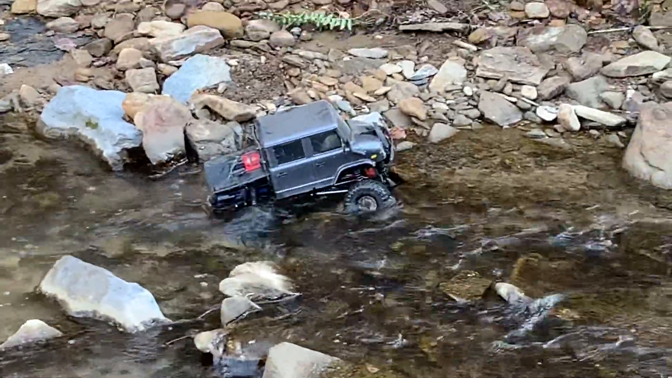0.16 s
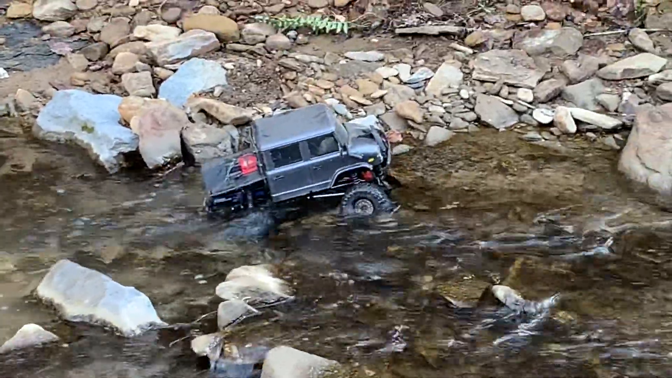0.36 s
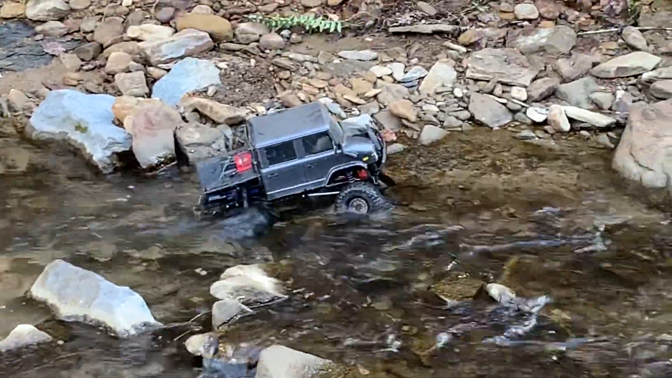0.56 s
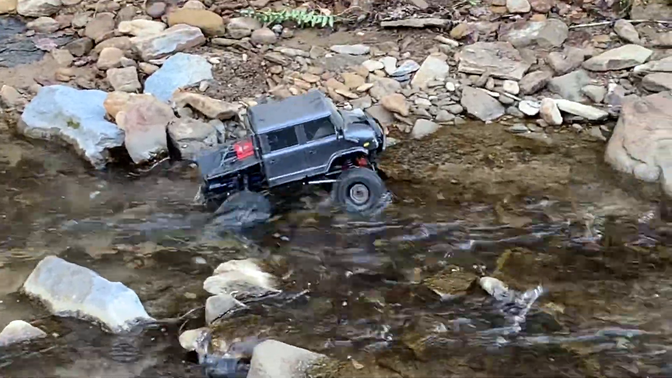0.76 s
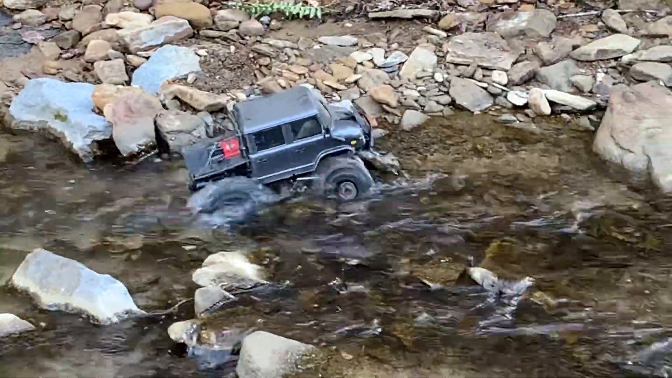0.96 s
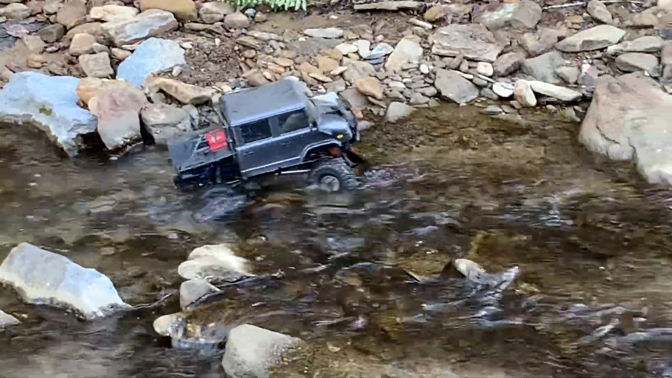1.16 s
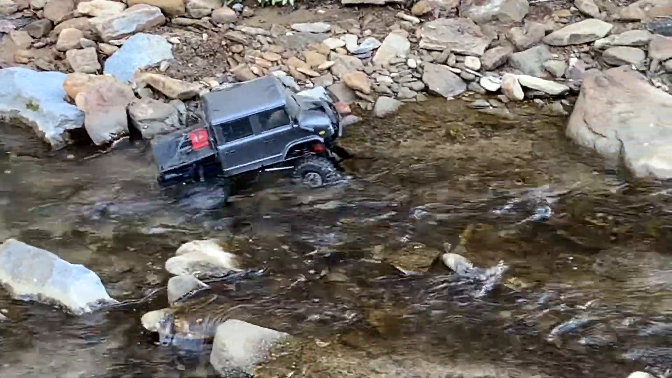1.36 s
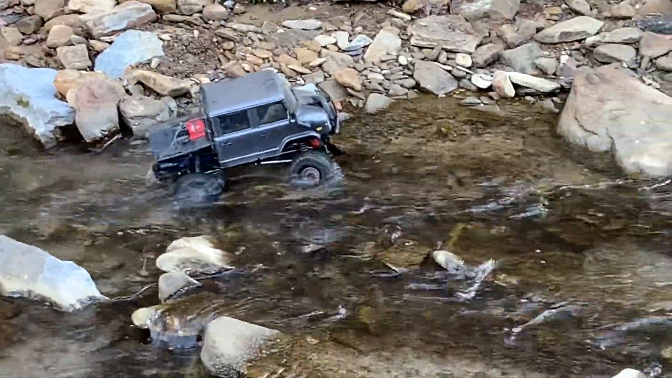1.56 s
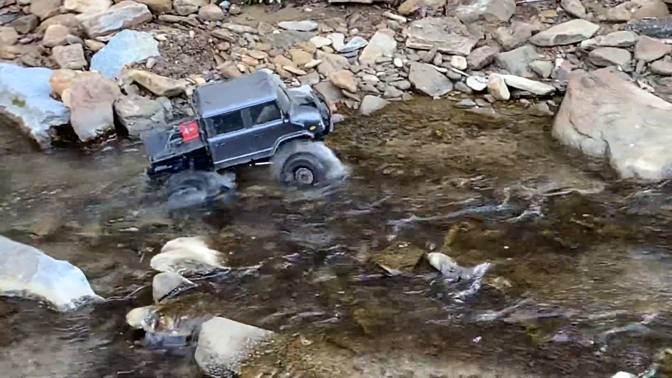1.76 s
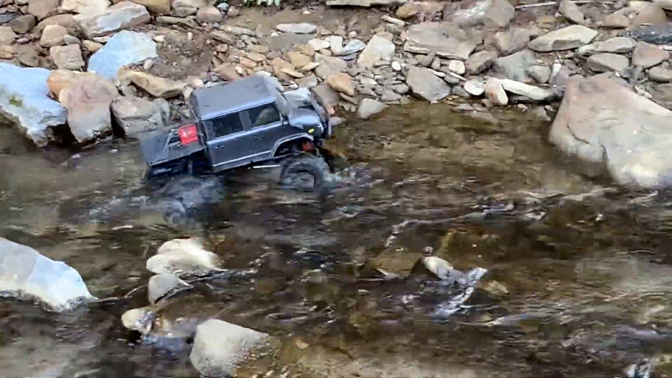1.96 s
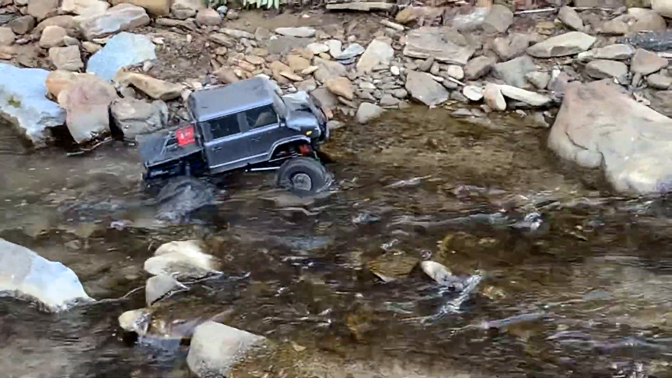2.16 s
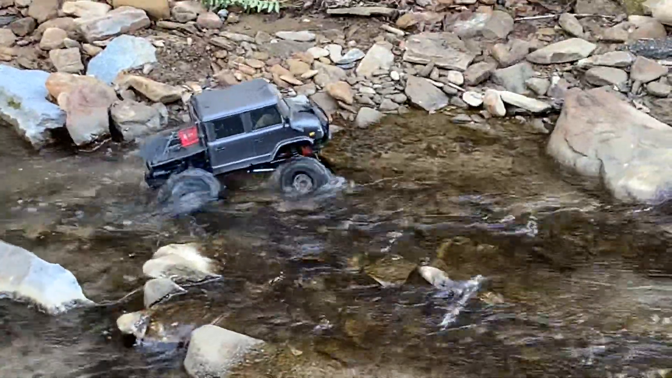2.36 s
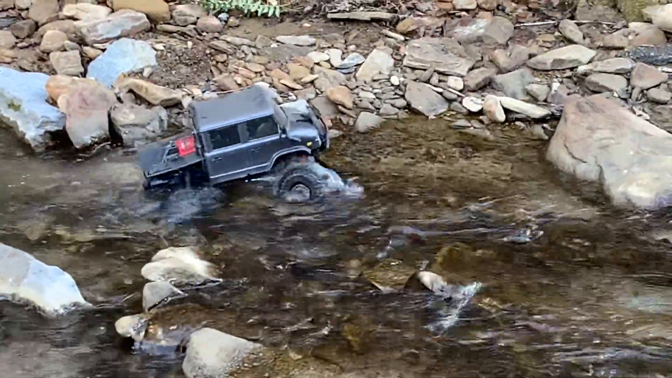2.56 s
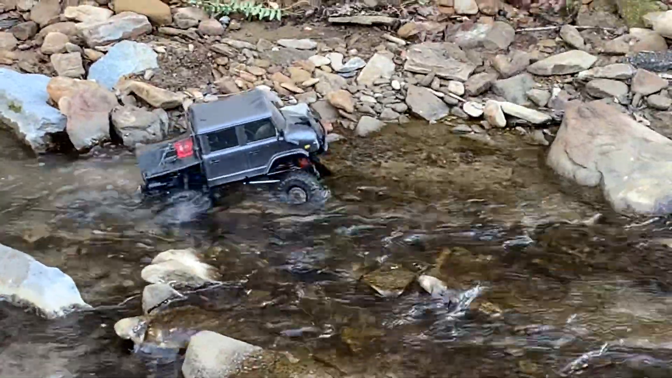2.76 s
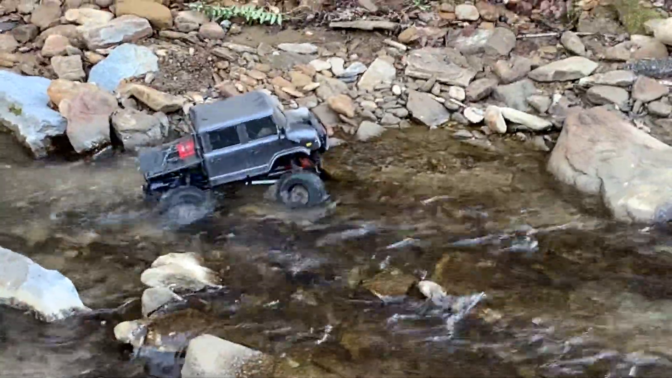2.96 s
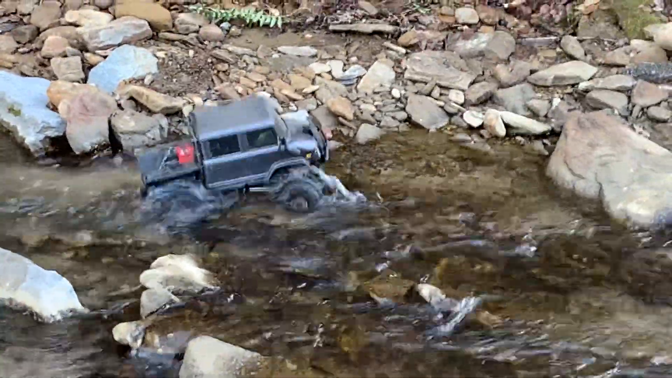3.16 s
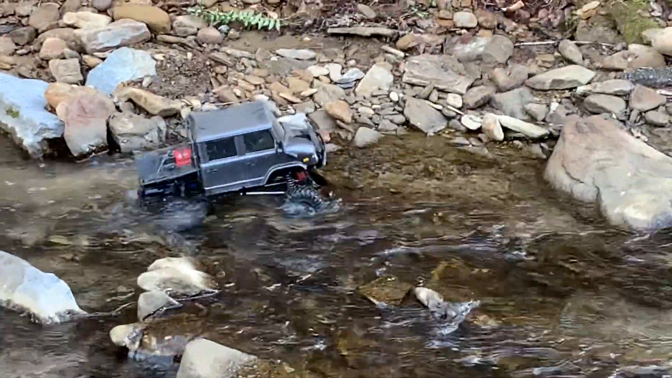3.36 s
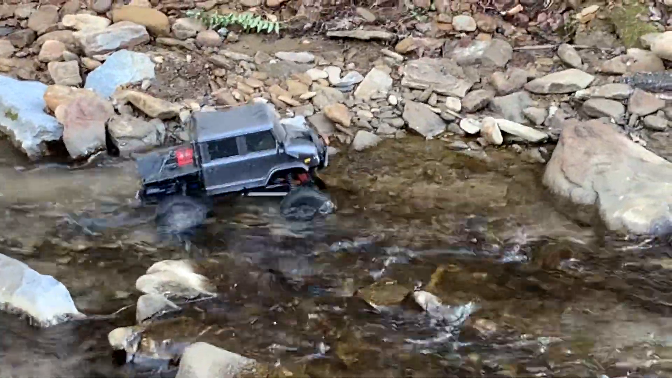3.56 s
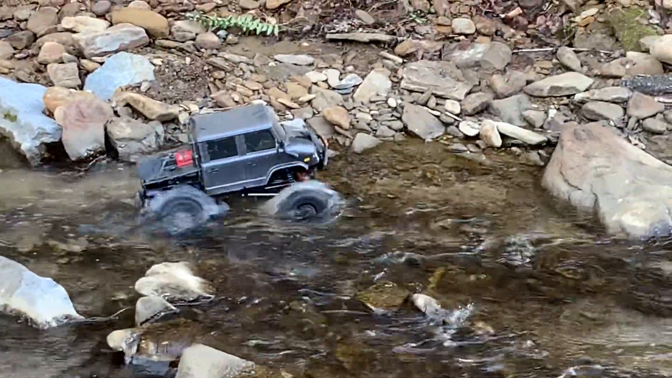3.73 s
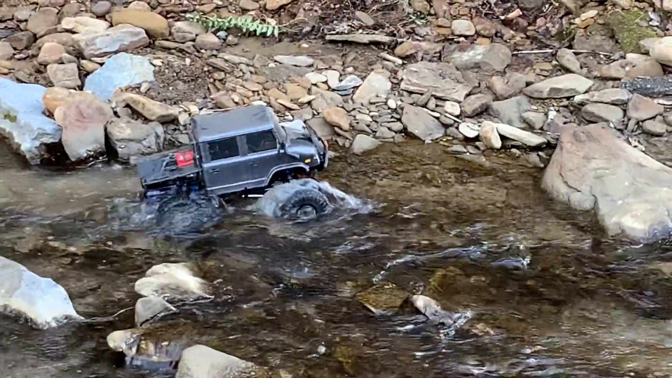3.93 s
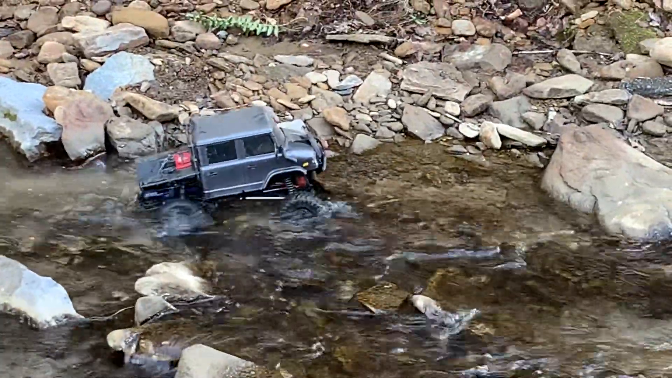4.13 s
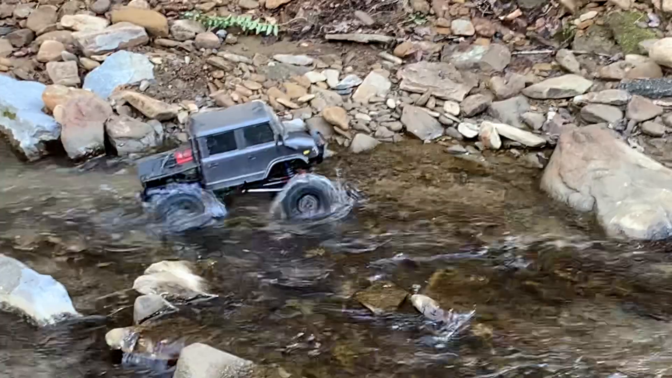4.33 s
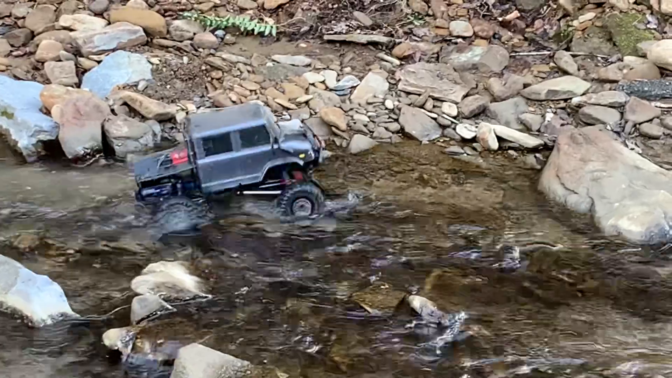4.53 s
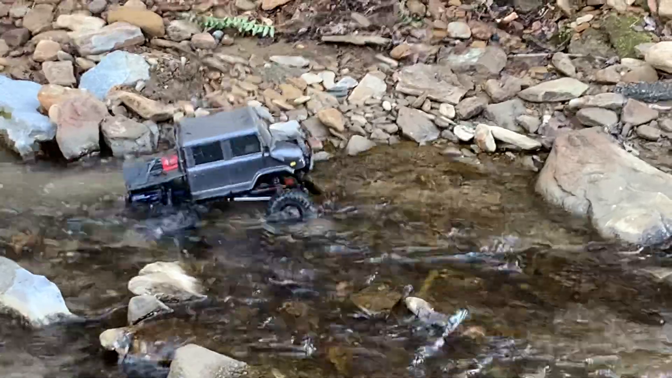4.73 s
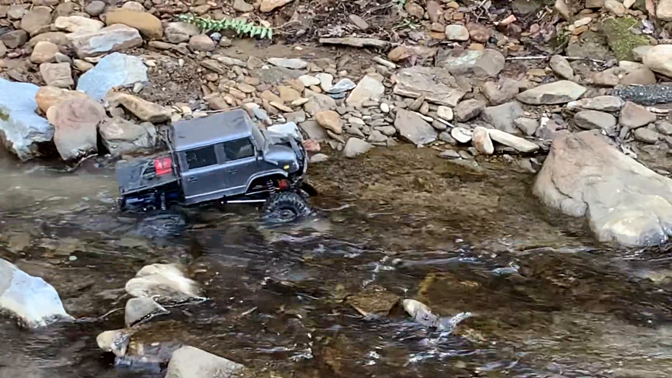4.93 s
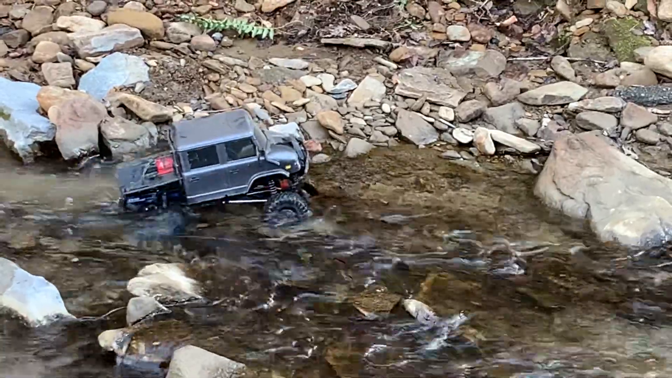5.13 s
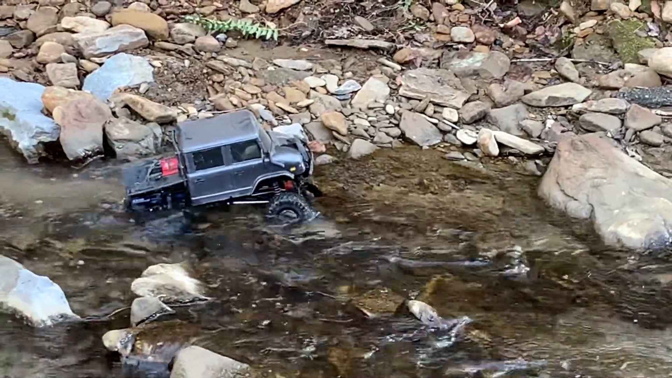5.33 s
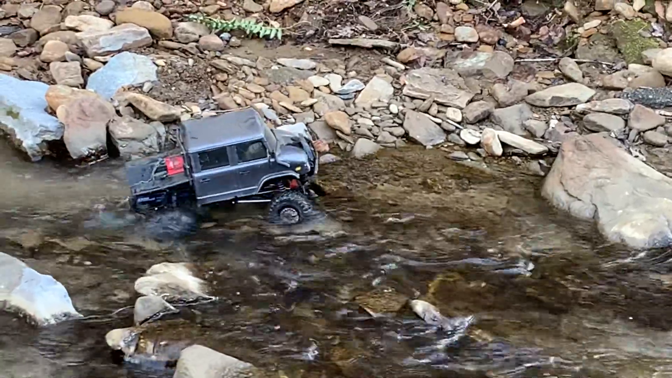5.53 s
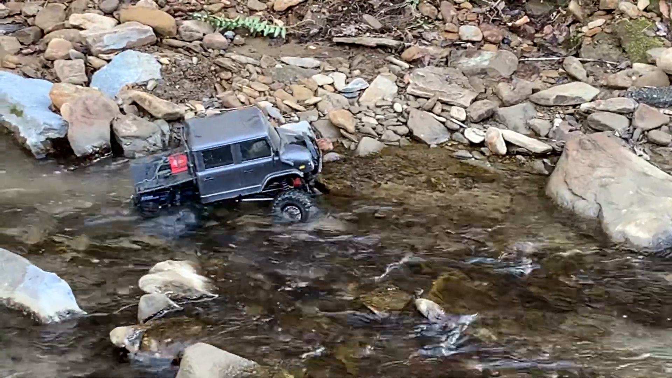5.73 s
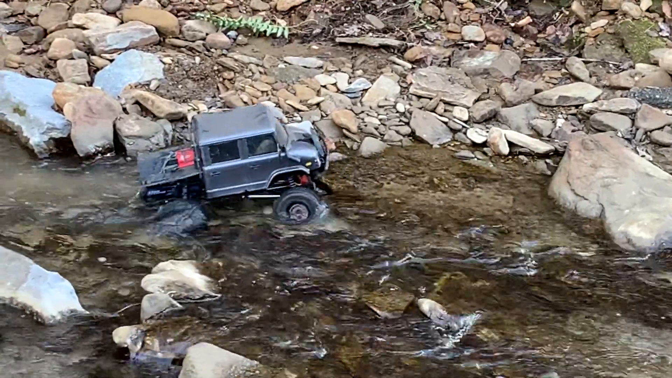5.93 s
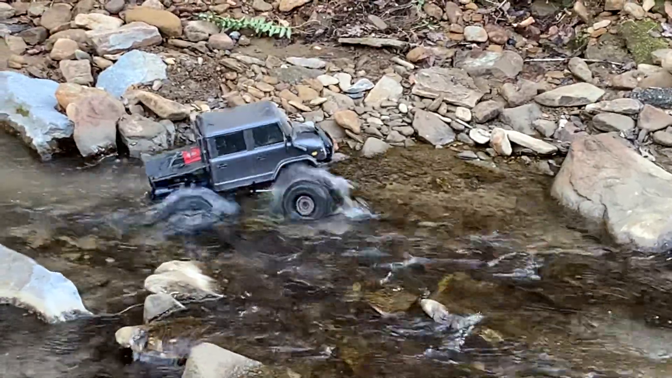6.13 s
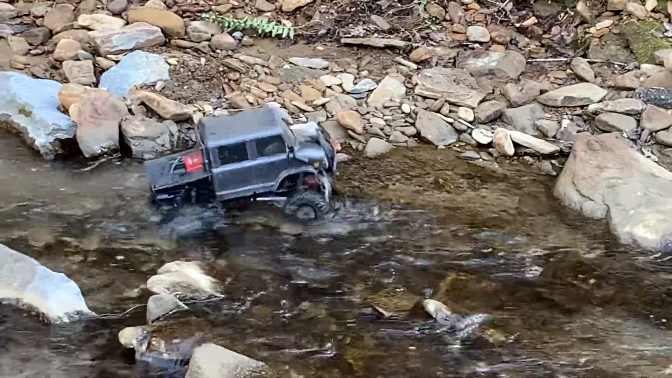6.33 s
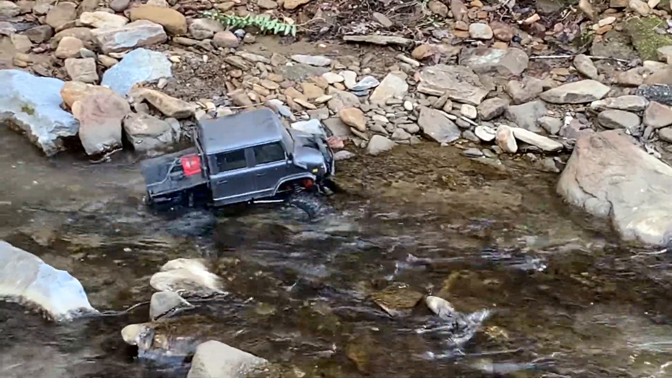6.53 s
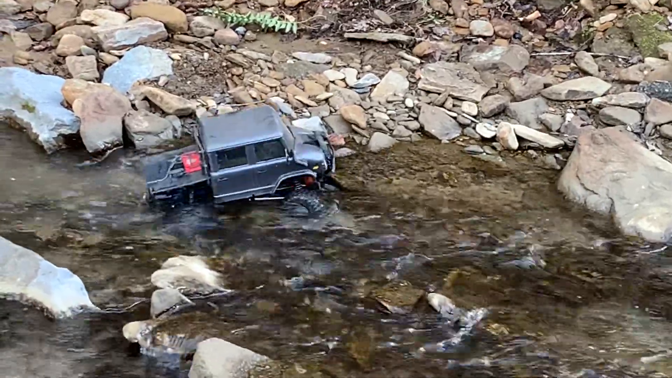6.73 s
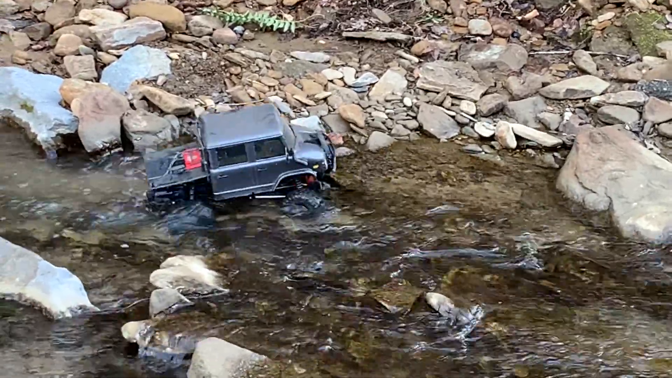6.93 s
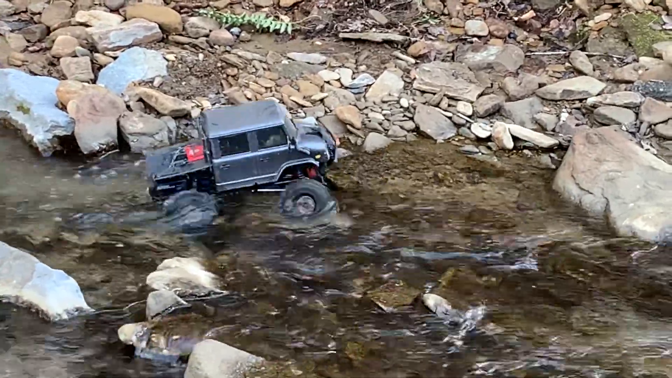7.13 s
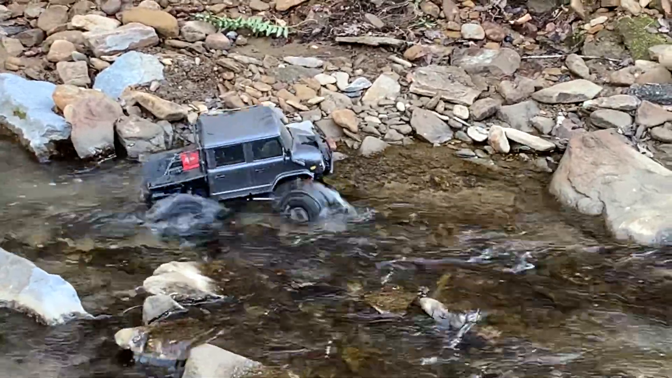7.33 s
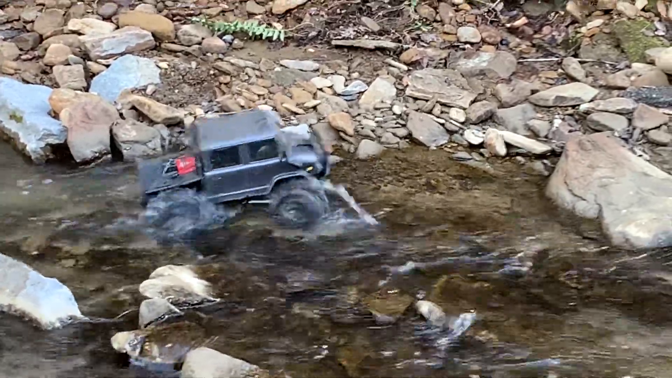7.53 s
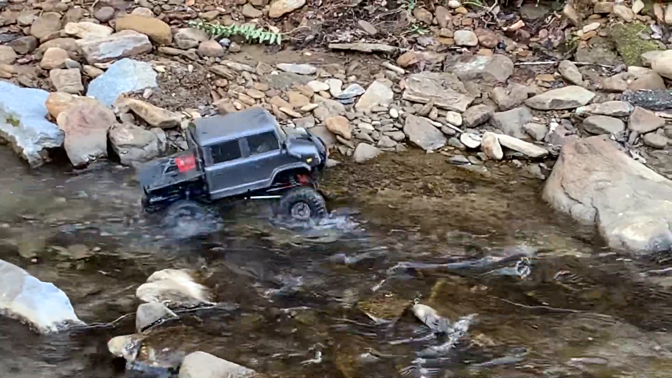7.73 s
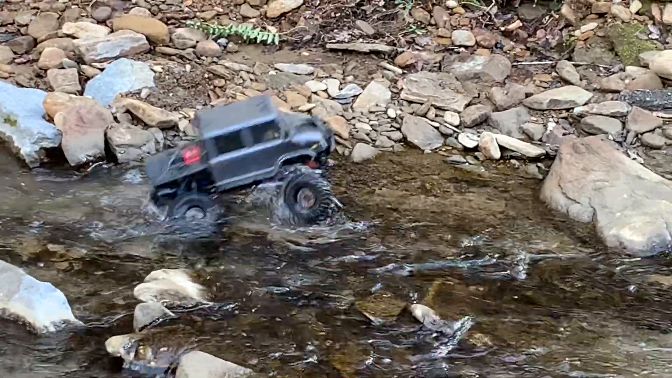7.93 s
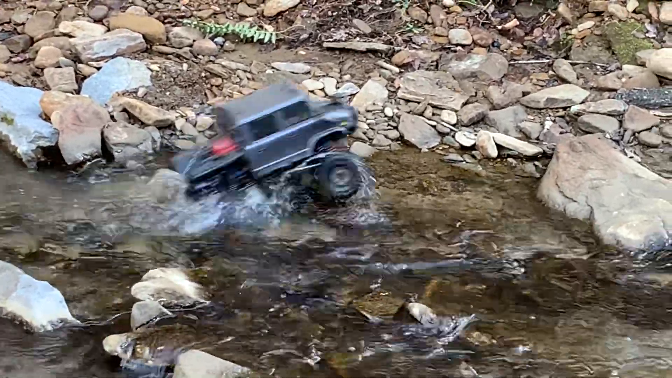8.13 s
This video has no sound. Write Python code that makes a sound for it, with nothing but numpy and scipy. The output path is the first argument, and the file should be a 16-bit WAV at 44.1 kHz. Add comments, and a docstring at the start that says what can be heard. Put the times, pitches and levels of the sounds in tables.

```python
"""Toy truck in a creek

A small electric model truck spins its wheels in bursts in a shallow, stony creek.
Each burst churns up ringing bubbles and fizzing spray and whirrs in the plastic shell.
Drops plop back, the creek trickles on, and a breeze rumbles on two close microphones."""
import sys
import numpy as np
from scipy import signal
from scipy.fft import rfft, irfft, next_fast_len
from scipy.io import wavfile

SR = 44100
rng = np.random.default_rng(int(sys.argv[2]) if len(sys.argv) > 2 else 0)


def file_out(sig):
    """Save sig as 16-bit WAV at sys.argv[1]."""
    # one column per channel
    cols = np.atleast_2d(sig).T
    # limit, then scale
    lim = np.clip(cols, -1, 1)
    pcm = np.round(lim * 32767).astype(np.int16)
    wavfile.write(sys.argv[1], SR, pcm)


N = 365588
FFT_SIZE = next_fast_len(N)
HZ, T = np.fft.rfftfreq(FFT_SIZE, 1 / SR), np.arange(N) / SR


def amp(db):
    """Turns decibels into a number to multiply by."""
    return 10 ** (np.asarray(db) / 20)


def unit_rms(x):
    """Scales a sound to an average (rms) strength of 1."""
    return x / np.sqrt(np.mean(x ** 2) + 1e-20)


def over_hz(points):
    """Joins a table's points into a curve over all frequencies."""
    f, value = np.transpose(points)
    return np.interp(np.log(HZ + 1), np.log(f + 1), value)


def colour(x, db):
    """Turns each frequency up or down by its own amount."""
    return irfft(rfft(x, FFT_SIZE) * amp(db), FFT_SIZE)[..., :N]


def waver(rate_hz):
    """A random wobble, mostly slower than rate_hz."""
    return unit_rms(colour(rng.standard_normal(N), -20 * np.log10(1 + (HZ / rate_hz) ** 2)))


def linger(power, fade_s):
    """Lets a sound's power die away gradually."""
    keep = np.exp(-1 / (fade_s * SR))
    return signal.lfilter([1 - keep], [1, -keep], power)


def bubbles(per_s, spread_db, cycles, lo_hz, hi_hz, clump_db, sizes):
    """Two swarms of bubbles. Each rings on a rising note; small ones are higher and shorter."""
    strength = amp(spread_db * np.minimum(rng.exponential(1, (2, N)), 4))
    births = strength * (rng.random((2, N)) < per_s / SR)
    size = rng.integers(0, sizes, (2, N))
    clump_times = np.arange(0, T[-1] + .1, .05)
    out = np.zeros((2, N))
    for k, hz in enumerate(np.geomspace(lo_hz, hi_hz, sizes)):
        clumps = amp(clump_db * np.interp(T, clump_times, rng.standard_normal(len(clump_times))))
        age = np.arange(int(3 * cycles * SR / hz) + 8) * hz / SR / cycles  # in lifetimes
        envelope = hz * (1 - np.exp(-6 * age)) * np.exp(-2 * age)  # small ones are louder
        ring = envelope * np.sin(2 * np.pi * cycles * age * (1 + 0.018 * age))
        out += signal.oaconvolve(clumps * births * (size == k), ring[None], axes=1)[:, :N]
    return unit_rms(out)


# Tone of the flowing water: f/Hz, gain/dB
FLOW_TONE = [(150, -4.5), (400, 1), (700, -4), (2000, -10), (2800, -6.5), (3200, -4), (6000, -15.5),
             (7500, -12.5), (11000, -31.5), (15800, 4.5)]
def trickle():
    """Water runs over stones: small bubbles in a soft wash, a babble, and fine droplet ticks."""
    small = bubbles(1300, 3.9, 12, 300, 10000, clump_db=3, sizes=20)
    babble = amp(-0.5) * bubbles(350, 2.8, 17, 900, 2800, clump_db=3.5, sizes=14)
    ticks = amp(-11) * bubbles(70, 2.5, 14, 3500, 6800, clump_db=2, sizes=8)
    wash = .13 * rng.standard_normal((2, N))
    flow = unit_rms(colour(.8 * small + wash, over_hz(FLOW_TONE)))
    return amp(-63 + 2.4 * waver(40)) * (flow + babble + ticks)


# Strength of the breeze: t/s, level/dB
BREEZE_LEVEL = [(0.0, -65.5), (0.6, -63.5), (1.3, -59.5), (1.87, -58.5), (6.2, -58.5), (6.6, -63),
                (8.29, -62)]
# Tone of its rumble: f/Hz, gain/dB
RUMBLE_TONE = [(20, -62), (45, -1), (70, -1.5), (120, -1), (185, 0.5), (230, -10), (400, -18), (700, -50)]
# Hollow puffs of wind: t/s, level/dB, f/Hz
PUFFS = [(0.35, -58, 59.6), (0.94, -51, 180), (1.829, -53, 84.74), (2.221, -50, 111.5), (2.87, -47, 56.6),
         (3.03, -45, 122), (3.65, -47, 112), (4.442, -52.5, 151), (4.77, -54, 59.3), (5.119, -52.5, 62),
         (5.401, -45, 108), (5.807, -47, 102), (6.30, -52, 175), (7.898, -54.5, 70.74)]
def breeze():
    """Wind rumbles on both microphones almost alike; short puffs boom on a drifting note."""
    puff_s, side_radians = 0.034, 0.5
    shared, left, right = rng.standard_normal((3, N))
    rumble = np.array([colour(shared + 0.5 * own, over_hz(RUMBLE_TONE)) for own in (left, right)])
    level_db = np.interp(T, *np.transpose(BREEZE_LEVEL))
    out = amp(level_db + 1.9 * waver(9.8)) * unit_rms(rumble)
    for (s, db, hz), (drift, lead, turn) in zip(PUFFS, rng.standard_normal((len(PUFFS), 3))):
        t = T - s
        phase = 2 * np.pi * (hz * t * (1 + 0.7 * (1 + drift) * t) + turn)
        side_shift = side_radians * lead * np.array([[1], [-1]])
        out += amp(db) * np.exp(-(t / puff_s) ** 2) * np.sin(phase + side_shift)
    return out


# Drops landing on water and stone: t/s, level/dB, f/Hz, left minus right/dB
DROP_HITS = [(0.075, -44, 585, 5), (0.303, -43.5, 570, 6), (0.331, -48, 2190, 4), (0.455, -49, 2860, -0.5),
             (0.457, -52, 3890, -3), (1.047, -40.5, 1100, -9), (1.282, -47.5, 1360, -16),
             (1.397, -46.5, 1384, 3), (2.62, -43, 1500, -2.5), (2.689, -50, 6140, 7.5),
             (2.707, -44.5, 1218, -9), (2.769, -39.5, 2060, 12), (3.211, -41.5, 1080, -9),
             (3.268, -44, 2000, -2), (3.304, -40, 1210, -9), (3.326, -48.5, 6800, -4.5),
             (3.328, -35.5, 2020, -8), (3.397, -47.5, 1300, -6), (3.447, -48, 2600, -3),
             (4.027, -48, 3720, -4), (4.081, -39.5, 2000, 15.5), (4.499, -43, 1600, -5),
             (4.521, -40.5, 1180, -8), (4.649, -43, 1390, -1.5), (4.697, -48.5, 2130, 7),
             (5.109, -54.5, 2780, -1), (5.169, -53, 4870, -5), (5.368, -44, 2030, 3),
             (5.541, -51, 5220, -3), (5.644, -47.5, 2330, 2), (6.297, -44, 3550, -8),
             (6.336, -45.5, 960, -7.5), (6.394, -42, 1131, -1), (6.397, -46, 6500, -3),
             (6.617, -49, 2490, -2), (6.835, -55, 3730, -2), (6.862, -52, 4200, -2),
             (6.906, -43.5, 2530, 0), (7.675, -43, 3870, -8), (7.861, -29.5, 1400, -5)]
def drops():
    """Each drop clicks and rings one rising bubble, then four fainter, mostly deeper ones."""
    click_s, ring_s = 0.0069, 0.015  # time to fade by 60 dB
    out, t = np.zeros((2, N + 4000)), np.arange(1200) / SR
    envelope = (1 - np.exp(-t / 0.00033)) * amp(-60 * t / ring_s)
    for (s, db, hz, pan_db), luck in zip(DROP_HITS, rng.standard_normal((len(DROP_HITS), 4, 3))):
        cluster = [(0.00045, 0, 0.99)]
        for delay, loudness, pitch in luck:
            cluster.append((0.01 * abs(delay + 0.6), -13 + 1.8 * loudness, np.exp(0.3 * (pitch - .5))))
        click = 0.18 * rng.standard_normal(len(t)) * amp(-60 * t / click_s)
        plop = np.pad(click, (0, 2800))
        for late_s, gain_db, ratio in cluster:
            ring = envelope * np.sin(2 * np.pi * hz * ratio * t * (0.992 + 6 * t))
            plop[min(round(late_s * SR), 2800):][:len(t)] += amp(gain_db) * ring / abs(ring).max()
        out[:, round(s * SR):][:, :len(plop)] += amp([[db + pan_db / 2], [db - pan_db / 2]]) * plop
    return out[:, :N]


# Bursts of wheelspin: t/s, speed-up/s, hold/s, slow-down/s, relative churn level/dB,
# spray above churn/dB, stirred water above churn/dB
WHEELSPINS = [(0.58, 0.27, 0.15, 0.045, -38.5, -5.5, -10), (1.396, 0.27, 0.082, 0.75, -40.5, -6.5, -2),
              (1.928, 0.079, 0.018, 0.051, -46, -29, -20), (2.042, 0.17, 0.014, 0.2, -38, -8.5, -21.5),
              (2.201, 0.16, 0.1, 0.095, -38.5, -8.5, -21), (2.688, 0.028, 0.07, 0.14, -54, -24, -20),
              (2.807, .15, 0.14, 0.15, -37.5, -7.5, -8.5), (3.532, 0.061, 0.23, 0.08, -37, -6.5, -12.5),
              (4.115, 0.072, 0.18, 0.1, -42, -6, -15), (4.192, 0.11, 0.11, 0.077, -41, -12.5, -11),
              (5.84, 0.15, 0.17, 0.22, -40, -6.5, -8), (6.813, 0.13, 0.12, 0.066, -55.5, -31, -39),
              (7.042, 0.078, 0.072, 0.13, -41.5, -8.5, -6), (7.156, .14, 0.046, 0.078, -42.5, -4, 0.5),
              (7.319, 0.22, 0.055, 0.1, -43.5, -5, -6), (7.673, 0.14, 0.051, 0.042, -38, -6, 0),
              (7.873, 0.17, 0.032, 0.23, -39, -2.5, 0.5), (8.113, .15, 0.057, .10, -39.5, -1.5, -1)]
# Thrown water pattering back late: t/s, half-width/s, relative level/dB
LATE_SHOWERS = [(1.18, 0.044, -58.5), (2.70, 0.024, -64), (3.25, 0.045, -54), (4.57, 0.022, -59),
                (6.30, 0.014, -69), (7.22, 0.11, -52), (7.45, 0.052, -51.5)]
def wheels():
    """How loud churn and spray are as the wheels speed up, hold and slow, and the water settles."""
    ends_db, grip_s, settle_s, runoff_s = -20.5, 0.019, 0.098, 0.076
    churned, stirred, thrown = np.zeros((3, N))
    for s, up, hold, down, db, spray_db, stirred_db in WHEELSPINS:
        rise_left = np.clip(1 - (T - s) / up, 0, None) ** 1.48  # flattens near the top
        fall = np.clip((T - s - up - hold) / down, 0, None)
        grip = np.clip((T - s) / grip_s, 0, 1)
        power = (grip * amp(np.maximum(db + ends_db * (rise_left + fall), -150))) ** 2
        wetness = np.clip((T - s) / (up + 0.55 * hold), 0, 1)  # wetter tyres throw more spray
        churned += power
        stirred += power * amp(stirred_db) ** 2
        thrown += power * amp(spray_db + 9.5 * (wetness - 1)) ** 2
    current = amp(-71.5) ** 2  # flows round the tyres even at rest
    churned += linger(stirred, settle_s) + current
    runoff = amp(-12) ** 2 * linger(thrown, runoff_s)  # water leaving the body
    dribble = amp(-70.5 + 1.8 * waver(35)) ** 2
    showers = sum(amp(db) ** 2 * np.exp(-((T - s) / width) ** 2) for s, width, db in LATE_SHOWERS)
    thrown += runoff + showers + dribble
    return 10 * np.log10(churned), 10 * np.log10(thrown)


# Notes at which the shell and frame ring: f/Hz, width/Hz, boost/dB
SHELL_NOTES = [(1100, 80, 3), (1265, 70, 4.5), (1620, 90, 5.5), (2030, 90, 3.5), (2455, 60, 6),
               (2830, 200, 4), (5240, 120, 6)]
def shell_db():
    """The plastic shell boosts sound made under it near its own notes."""
    return sum(db / (1 + (2 * (HZ - hz) / width) ** 2) for hz, width, db in SHELL_NOTES)


# Tone of the churned water: f/Hz, gain/dB
CHURN_TONE = [(60, -32), (150, -10), (330, -10), (550, -20.5), (900, -2.5), (1500, -0.5), (2900, -3.5),
              (3300, -18.5), (4500, 8.5), (7000, -69)]
def churn(level_db):
    """Tyre treads beat the water into dense bubbles, with a whirr from the shell and wet body."""
    body_hz, body_width_hz = 1604, 86
    gurgle = bubbles(3600, 2.7, 26, 250, 3600, clump_db=1.8, sizes=44)
    froth = colour(gurgle + 0.31 * rng.standard_normal((2, N)), over_hz(CHURN_TONE) + shell_db())
    mids = colour(froth, np.where((HZ > 800) & (HZ < 3200), 0, -200))
    froth /= np.std(mids)
    body = colour(froth, -20 * np.log10(1 + (2 * (HZ - body_hz) / body_width_hz) ** 2))
    body_gain = amp(-5 + 0.8 * (level_db + 30))  # grows faster than the churn
    return amp(2 + level_db) * (froth + body_gain * body)


# Tone of the spray: f/Hz, gain/dB
SPRAY_TONE = [(1500, -40), (3300, 1.5), (4800, -0.5), (6000, 0), (7000, -8.5), (8500, -34), (16000, -79)]
# Tone of the finest mist: f/Hz, gain/dB
MIST_TONE = [(5000, 5.5), (7500, -1), (10000, 6.5), (14000, -3.5), (15800, -12)]
def spray(level_db):
    """Water flung off the tyres fizzes unevenly as it lands; mist hangs a little longer."""
    tiny = bubbles(6000, 2.2, 20, 2800, 15500, clump_db=2.5, sizes=24)
    fizz = (0.41 * tiny + .5 * rng.standard_normal((2, N))) * amp(1.1 * waver(25))
    thrown = amp(level_db)
    hanging = np.sqrt(linger(thrown ** 2, fade_s=0.0041))
    mist = colour(hanging * fizz, over_hz(MIST_TONE) - 1)
    return colour(thrown * fizz, over_hz(SPRAY_TONE) + shell_db() + 13) + mist


def slosh(level_db):
    """Water gurgles round the tyres, fading less than the churn when the wheels rest."""
    gurgles = bubbles(260, 3.2, 17, 1000, 2900, clump_db=3.5, sizes=12)
    return amp(0.5 * (level_db + 46.5) - 58) * gurgles


# Short sliding notes in the churn: middle t/s, f/Hz, slide/(Hz per s), relative level/dB
SLIDING_NOTES = [(0.74, 1120, 3500, -51), (0.845, 1283, 100, -39.5), (0.88, 1584, 500, -35),
                 (0.95, 1497, -7000, -40), (3.645, 1660, -1000, -35), (3.73, 1446, 100, -36),
                 (5.92, 1030, -1000, -43), (5.985, 1550, 100, -40.5), (6.13, 1990, 100, -40),
                 (7.085, 1092, 500, -43), (7.165, 1593, 100, -38.5), (7.34, 1320, 100, -40),
                 (7.83, 1940, -2000, -36), (8.075, 1630, -6000, -35)]
def sliding_notes():
    """Gurgles and brief motor whines: each swells and fades on one unsteady note."""
    swell_s, wobble_db = 0.021, 2
    out = np.zeros(N)
    for (s, hz, slide, db), turn in zip(SLIDING_NOTES, rng.random(len(SLIDING_NOTES))):
        near = slice(round((s - .1) * SR), round((s + .1) * SR))
        t = T[near] - s
        phase = 2 * np.pi * (hz * t + slide * t ** 2 / 2 + turn)
        out[near] += amp(db) * np.exp(-(t / swell_s) ** 2) * np.sin(phase)
    return np.array([out * amp(wobble_db * waver(60)), np.zeros(N)])  # first swarm only


def microphones(swarms, likeness, pan_db, lead):
    """The right side hears the first swarm; the left hears it shifted, mixed with the second."""
    right, other = rfft(swarms, FFT_SIZE)
    alike = np.clip(over_hz(likeness), 0, 1)
    shifted = np.exp(1j * over_hz(lead)) * right
    left = amp(over_hz(pan_db)) * (alike * shifted + np.sqrt(1 - alike ** 2) * other)
    return irfft(np.array([left, right]), FFT_SIZE)[:, :N]


# How alike the two sides sound: f/Hz, likeness/(0 to 1)
TRUCK_ALIKE = [(100, .95), (400, .95), (580, .4), (800, .93), (2000, .87), (4000, .7), (5200, .85),
               (6500, .3), (8300, .95), (15800, .94)]
CREEK_ALIKE = [(100, .95), (500, .4), (1200, .7), (3000, .5), (6000, .35), (8300, .97), (15800, .97)]
# How much louder the left side is: f/Hz, left minus right/dB
TRUCK_BALANCE = [(260, .5), (400, -2), (600, -7), (1140, -4), (1650, -6), (3400, -5.5), (5200, -11),
                 (6200, -8), (7100, -1), (8000, 0)]
CREEK_BALANCE = [(400, 0), (2500, -.5), (3500, -2), (5500, -4), (7000, 0)]
# How far the left wave runs ahead: f/Hz, phase/radians
TRUCK_PHASE = [(300, 0), (700, 1.2), (1700, .8), (2800, 2.7), (4500, 1.8), (5600, 3), (6700, 1),
               (7000, -2.8), (9300, -3.2), (10300, -6.2), (11700, -6.3), (12700, -9.3), (14300, -9.5),
               (14900, -12.5)]
CREEK_PHASE = [(300, 0), (1000, 1.8), (2200, -1), (3300, -3.5), (4500, -4.8), (6300, -6.3), (8000, -9.3),
               (9200, -9.5), (10300, -12.5), (11700, -12.6), (12700, -15.6), (14200, -15.8), (15100, -18.8)]
def scene():
    """Truck, creek, drops and breeze add up at the two microphones."""
    churn_db, spray_db = wheels()
    splashing = churn(churn_db) + spray(spray_db) + slosh(churn_db) + sliding_notes()
    truck = microphones(splashing, TRUCK_ALIKE, TRUCK_BALANCE, TRUCK_PHASE)
    creek = microphones(trickle(), CREEK_ALIKE, CREEK_BALANCE, CREEK_PHASE)
    return truck + creek + drops() + breeze()


def record(dry):
    """Cuts off the very highest treble."""
    lowpass = signal.firwin(2047, cutoff=15880, window=("kaiser", 11), fs=SR)
    return signal.oaconvolve(dry, lowpass[None], "same")


dry = scene()
out = record(dry)
file_out(out)
```